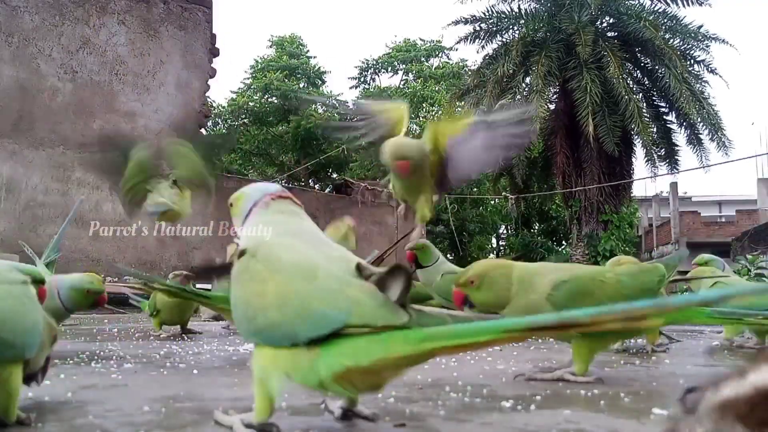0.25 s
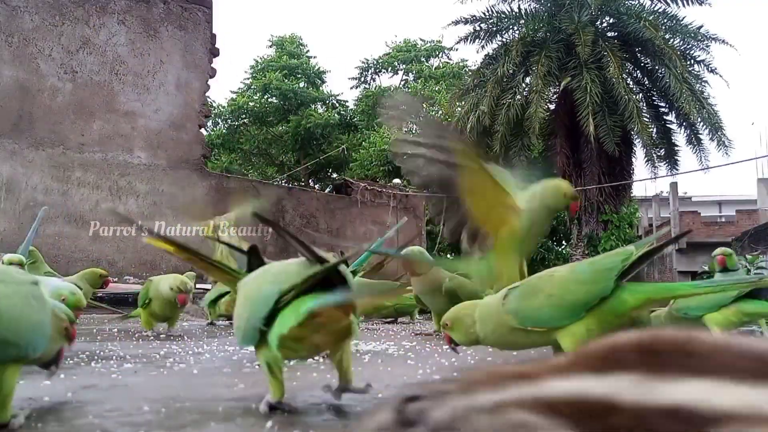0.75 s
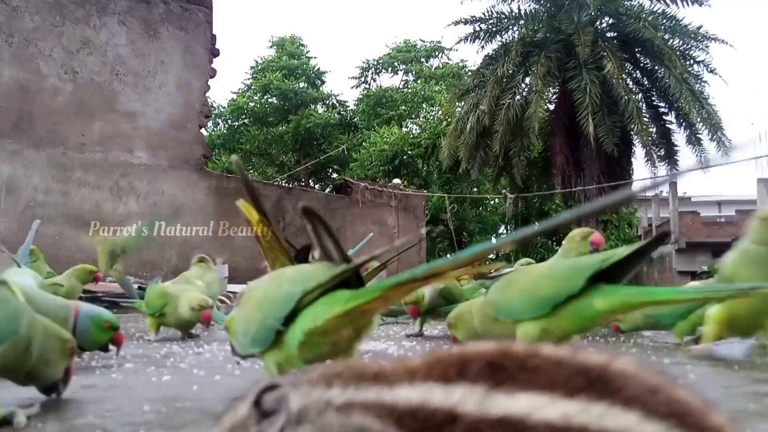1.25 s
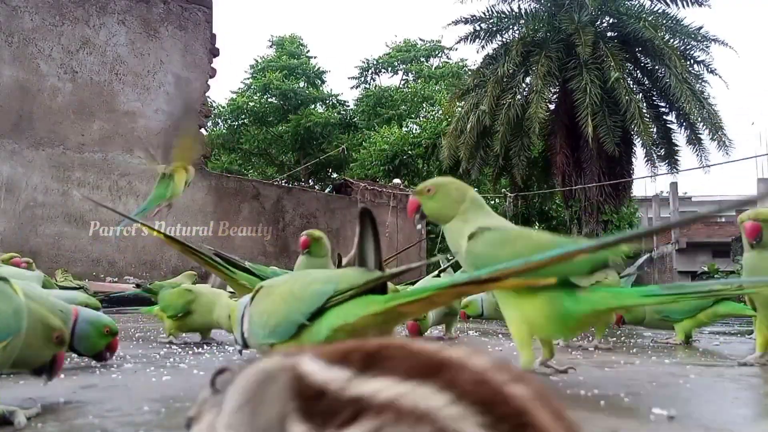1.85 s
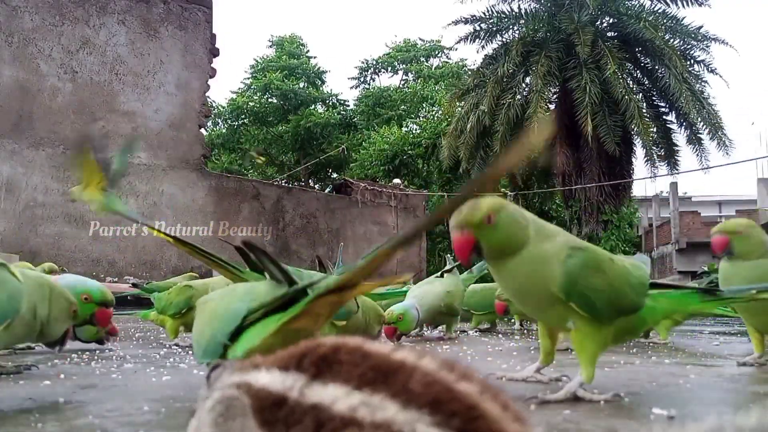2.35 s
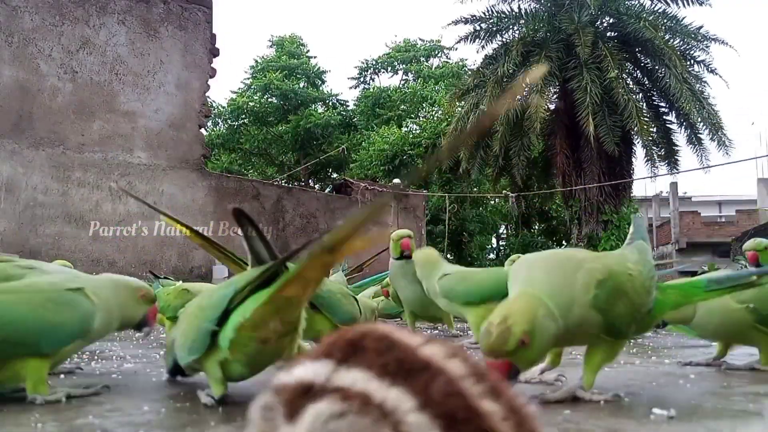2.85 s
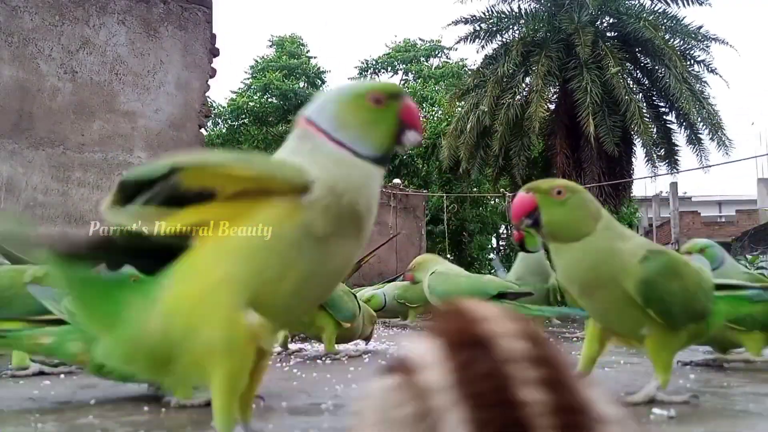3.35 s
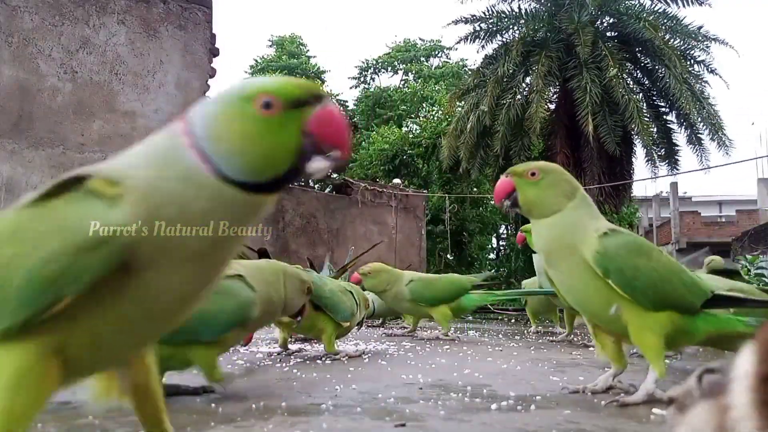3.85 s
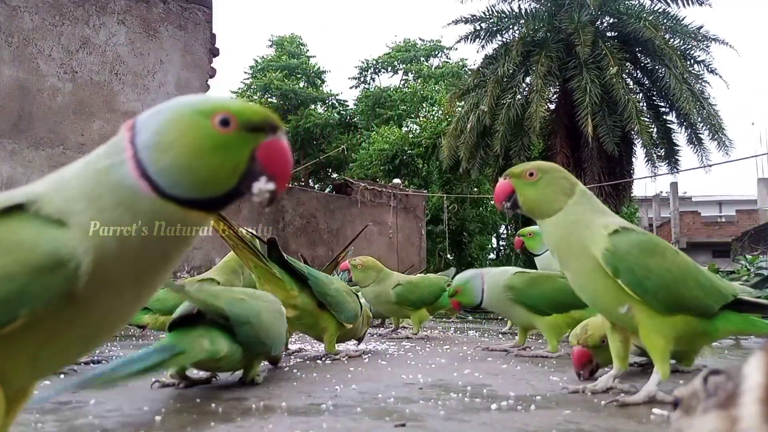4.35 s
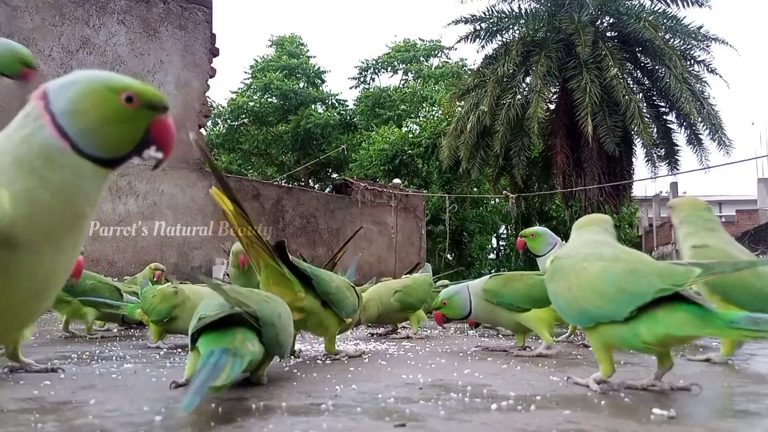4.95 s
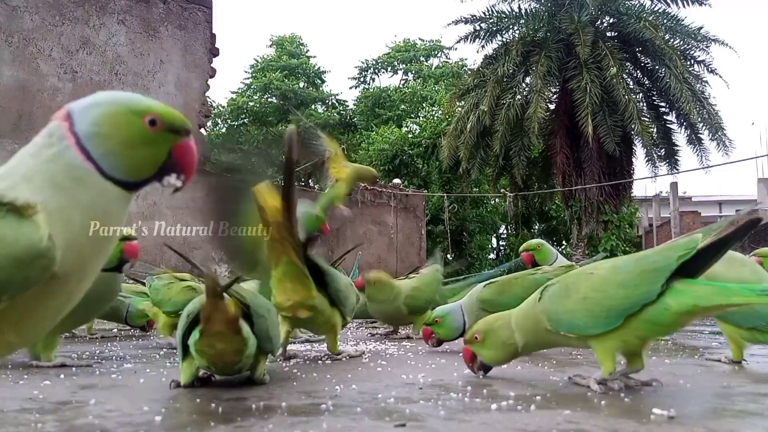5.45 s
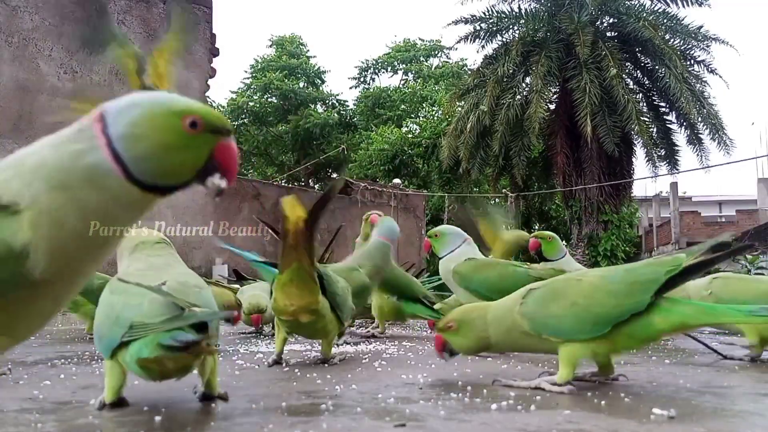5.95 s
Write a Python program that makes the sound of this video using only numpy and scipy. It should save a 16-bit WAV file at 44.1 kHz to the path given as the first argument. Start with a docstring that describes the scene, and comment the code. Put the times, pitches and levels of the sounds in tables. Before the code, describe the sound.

Parakeets feed on a flat roof: wings flutter, one harsh close squawk, soft chirrups, beak ticks, then shrill calls over a faint high whine.

```python
"""First a thin high whine, like an insect in the trees, over a low rumble and a patter of feet and beaks.
Then parakeets feed on a flat roof: wings flap, one squawks harshly close by, beaks tick on grain.
Soft chirrups, shrill calls from farther off and low grumbles follow; a draught buffets the microphone.
Voices are mostly stacks of gliding harmonics, the rest is mostly shaped noise; the walls give a short echo."""
import sys
import numpy as np
from scipy import signal
from scipy.fft import rfft, irfft, next_fast_len
from scipy.io import wavfile
from scipy.ndimage import uniform_filter1d, map_coordinates

SR = 44100
rng = np.random.default_rng(int(sys.argv[2]) if len(sys.argv) > 2 else 0)


def dump_mix(stems):
    """Bounce the given channels to the path in sys.argv[1] as a 16-bit WAV at rate SR."""
    frames = np.atleast_2d(stems).T  # one column per channel
    limited = np.clip(frames, -1, 1)  # hard clip at full scale
    pcm = np.round(limited * 32767).astype(np.int16)
    wavfile.write(sys.argv[1], SR, pcm)


N = 273420
T = np.arange(N) / SR  # time of each sample, s
TOP_HZ = 15800  # no sound is kept above this


def amp(db):
    """Turn decibels into a gain."""
    return 10 ** (np.asarray(db) / 20)


def unit(x):
    """Scale to an rms (average strength) of 1."""
    return x / np.sqrt(np.mean(x ** 2) + 1e-20)


def along(points, hz):
    """Read a curve of (f/Hz, value) points on a log frequency axis."""
    f, v = np.transpose(points)
    return np.interp(np.log(hz + 1), np.log(f + 1), v)


def curves(rows, t=T):
    """Draw straight lines between the rows: one curve for each column after the time."""
    s, *cols = np.transpose(rows)
    return [np.interp(t, np.sort(s), c) for c in cols]


def gate(rows, t=T):
    """Open (1) from the first row's time to the last, with soft 5 ms edges."""
    to_edge = np.minimum(t - rows[0][0], rows[-1][0] - t)
    return np.sin(np.pi / 2 * np.clip(to_edge / .005, 0, 1)) ** 2


def wobble(rate, size=N):
    """A smooth random curve through `rate` random points a second."""
    knots = rng.standard_normal(int(size * rate / SR) + 4)
    return map_coordinates(knots, [np.arange(size) * rate / SR])


def coloured(x, points):
    """Filter x to a (f/Hz, level/dB) shape, with no sound ahead of its cause."""
    m = 2 * next_fast_len(N // 2 + 4096)
    shape = amp(along(points, np.fft.rfftfreq(m, 1 / SR)))
    # folding the cepstrum (spectrum of the log spectrum) makes the filter minimum-phase
    cepstrum = irfft(np.log(shape))
    cepstrum[1:m // 2] *= 2
    cepstrum[m // 2 + 1:] = 0
    return irfft(rfft(x, m) * np.exp(rfft(cepstrum)))[:N]


def noise(points):
    """Hiss with the given colour, rms 1."""
    return unit(coloured(rng.standard_normal(N), points))


def lumpy(x, depth_db):
    """Random gain in patches of about 30 ms by 260 Hz, as from many small sources; rms 1."""
    z = signal.stft(x, nperseg=512)[2]
    patches = uniform_filter1d(rng.standard_normal(z.shape), size=3, axis=0)  # across frequency
    patches = uniform_filter1d(patches, size=5, axis=1)  # across time
    return unit(signal.istft(z * amp(depth_db * unit(patches)), nperseg=512)[1][:N])


# The whine's path: t/s, level/dB (before wavering and the line and hiss trims), centre f/Hz (before wander)
WHINE_PATH = [(0, -51, 3710), (.5, -48, 3736), (.9, -49, 3610), (1.24, -47.5, 3617), (1.41, -50.5, 3696),
              (1.54, -49.5, 3570), (1.75, -51.5, 3734), (1.9, -57.5, 3617), (2.35, -71, 3730),
              (3.78, -77, 3640), (3.93, -54, 3637), (4.06, -46, 3676), (4.4, -50.5, 3547),
              (4.72, -56, 3607), (5.22, -56.5, 3620), (6.2, -63, 3670)]
# Colour of the hiss around the whine: f/Hz, level/dB
WHINE_HISS = [(2000, -73.5), (2900, -27.5), (3150, -12.5), (3320, -3), (3460, -2), (3720, 4.5),
              (4030, -2.5), (4320, -14.5), (5200, -39.5), (7000, -58)]
WHINE_WAVER_DB, WHINE_WAVER_RATE = 1.82, 11  # depth in dB, random points a second


def whine(wander_hz=38, line_db=-3.5, hiss_db=-6.0):
    """Three fuzzy, wavering lines wander across each other inside a wider band of hiss."""
    db, hz = curves(WHINE_PATH)
    db = db + WHINE_WAVER_DB * wobble(WHINE_WAVER_RATE)
    lines = np.zeros(N)
    for _ in range(3):
        phase = 2 * np.pi * np.cumsum(hz + wander_hz * wobble(16)) / SR
        # random strengths of the two waves blur the tone
        lines += wobble(65) * np.cos(phase) + wobble(65) * np.sin(phase)
    # the lines are gone below -70 dB and full from -54 dB up
    strength = np.clip((db + 70) / 16, 0, 1)
    return amp(db) * (amp(line_db) * strength * unit(lines) + amp(hiss_db) * noise(WHINE_HISS))


# How busy the flock is: t/s, patter level/dB
BUSTLE = [(0, -69.5), (.22, -65), (.9, -66), (1.05, -70.5), (3.6, -70), (3.95, -62), (4.2, -72), (4.7, -70),
          (5.04, -66), (5.5, -68), (6.2, -63)]
# Colour of the patter: f/Hz, level/dB
PATTER_COLOUR = [(150, -17.5), (400, 3), (1000, -0.5), (1600, 5), (2100, -0.5), (2800, -7.5), (4500, -14.5),
                 (6500, -18.5), (8500, -38), (13500, -43), (15300, -18.5)]
# Colour of the low rumble: f/Hz, level/dB
RUMBLE_COLOUR = [(20, -36), (50, -8.5), (85, 0), (180, 0), (280, -3), (400, -19.5), (800, -18.5),
                 (2000, -49.5)]
# average dB, random slow drift in dB, dB of rumble per dB of bustle
RUMBLE_DB, RUMBLE_SWELL_DB, RUMBLE_FOLLOWS = -69, 0.2, 0.94


def background(patter_db=1):
    """A low rumble that grows with the bustle, and the patter of many small feet and beaks."""
    bustle_db, = curves(BUSTLE)
    low_db = RUMBLE_DB + RUMBLE_FOLLOWS * (bustle_db - bustle_db.mean()) + RUMBLE_SWELL_DB * wobble(4)
    patter = lumpy(noise(PATTER_COLOUR) * amp(patter_db * wobble(60)), 2.8)
    rumble = lumpy(noise(RUMBLE_COLOUR), 2.5)
    return amp(low_db) * rumble + amp(bustle_db) * patter


# Bouts of wingbeats: first beat t/s, number of beats, time between beats/s, swish level/dB (wings() trims it),
# air push level/dB, change over the bout/dB (down or up), stroke length/s (wings() adds 2 ms)
FLIGHTS = [ (0.172, 1, 0.093, -53, -77, 0, 0.011), (0.264, 6, 0.083, -38.5, -48, -17.5, 0.008),
           (0.297, 1, .085, -49, -53.5, 0, 0.0045), (0.327, 2, .082, -54.5, -45.5, 6, 0.0041),
           (0.54, 3, .04, -55.5, -53.5, -5, .012), (0.789, 1, .085, -50, -57.5, 0, 0.0037),
           (1.465, 1, .085, -61, -80, -2, 0.0085), (1.93, 1, .085, -67, -63, -3, 0.013),
           (3.853, 2, 0.074, -50.5, -45, 11, 0.0062), (3.871, 2, 0.069, -51.5, -47.5, -7, 0.0071),
           (4.989, 1, .085, -46.5, -63.5, 0, .01), (5.026, 2, 0.07, -52, -57.5, 4, 0.017),
           (5.093, 1, .085, -48.5, -65, 0, .006), (5.312, 1, .085, -53.5, -53.5, 0, 0.034)]
CHANGE_BEATS, PUSH_FOLLOWS = 1.3, 0.6  # pace of the change in beats; share of it the air push follows


def wingbeats():
    """List beats (t/s, swish/dB, push/dB, length/s), evenly spaced, that fade or swell after the first."""
    for start, beats, period, swish_db, push_db, change_db, length in FLIGHTS:
        for k in range(round(beats)):
            so_far_db = change_db * (1 - np.exp(-k / CHANGE_BEATS))
            yield start + k * period, swish_db + so_far_db, push_db + PUSH_FOLLOWS * so_far_db, length


# Colour of the feathers' swish: f/Hz, level/dB
FEATHERS = [(200, -4.5), (500, 7), (960, 4), (1400, 6.5), (2100, -1.5), (2900, -9), (4500, -16),
            (7000, -28), (9000, -45.5), (13000, -39), (15500, -35)]
# Colour of the air the wing pushes: f/Hz, level/dB
WING_PUSH = [(40, -36.5), (150, -1.5), (260, 9), (380, 4.5), (550, -15.5), (1000, -34.5), (3000, -80.5)]


def wings(swish_db=-3, grain_db=2.0):
    """Each stroke is a soft, lumpy swish of feathers on a low push of air."""
    swish_power, push_power = np.zeros(N), np.zeros(N)
    for s, feather_db, air_db, length in wingbeats():
        # a rounded bump, strongest 5 ms after the beat's time
        stroke = 1 / np.cosh(np.minimum(np.abs(T - s - .005) / (length + .002), 40))
        swish_power += (amp(feather_db) * stroke) ** 2
        push_power += (amp(air_db) * stroke) ** 2
    feathers = lumpy(noise(FEATHERS) * amp(grain_db * wobble(300)), 4.5)
    air = lumpy(noise(WING_PUSH), 1.5)
    return amp(swish_db) * np.sqrt(swish_power) * feathers + np.sqrt(push_power) * air


# Short low thumps, air on the microphone, and a brief low bird note at 5.404 s:
# t/s, level/dB, f/Hz, length/s
THUMPS = [(.275, -52.5, 85, 0.0053), (0.571, -45.5, 73.5, 0.007), (0.984, -55.5, 71.4, 0.014),
          (3.856, -37.5, 70, 0.0085), (4.016, -25, 117, 0.005), (4.034, -20.5, 137.4, 0.0044),
          (4.058, -37.5, 148, 0.0048), (5.404, -41, 242.5, 0.0082), (5.88, -50.5, 235, 0.011)]
# One gust against the microphone: t/s, level/dB
GUST = [(3.55, -86), (3.8, -47.5), (3.95, -46), (4.09, -41), (4.14, -58), (4.25, -60), (4.5, -81.5)]
# Colour of the gust: f/Hz, level/dB
BUFFET = [(15, -25), (35, -10.5), (70, 3.5), (130, -2), (200, -11), (350, -25), (900, -79)]


def draught_and_thumps():
    """A gust rumbles on the microphone as low noise; thumps and one low bird note are short smooth pulses."""
    out = amp(curves(GUST)[0]) * gate(GUST) * noise(BUFFET)
    for s, db, hz, length in THUMPS:
        swell = np.exp(-.5 * ((T - s) / length) ** 2)
        out -= amp(db) * swell * np.cos(2 * np.pi * hz * (T - s))
    return out


# The harsh squawk: t/s, pulse rate f/Hz (before jitter), level/dB, beak opening/0-1
SQUAWK = [(.853, 148.6, -57, 0), (.862, 149.5, -35.5, 0.03), (.873, 145.6, -25.5, .05),
          (.886, 149.4, -24.5, 0), (.902, 145.9, -24, 0.7), (.925, 141.4, -25, 0.9),
          (.952, 146.8, -27.5, 0.94), (.973, 151, -33.5, 1), (.979, 148, -45, 0.7)]
# Colour of the voice with the beak nearly shut: f/Hz, level/dB
BEAK_NARROW = [(400, -58.5), (750, -42), (1000, -21.5), (1300, 1.5), (1600, -3), (1820, -13.5), (2100, -5),
               (2800, -11), (3500, -24), (4900, -18.5), (7500, -37.5), (9000, -52), (13000, -52.5),
               (15500, -37)]
# Colour of the voice with the beak open: f/Hz, level/dB
BEAK_WIDE = [(400, -34.5), (620, -35), (820, -14), (1200, -0.5), (1700, -6), (2050, 6), (2400, -7),
             (2800, -4), (3300, -21.5), (4100, -6), (5200, -24), (7500, -33.5), (9500, -54.5), (15500, -49)]


def squawk(ring=0.0068):
    """The syrinx (a bird's voice box) opens in near-regular bursts; the beak's opening changes the colour."""
    hz, db, opening = curves(SQUAWK)
    jitter, burst, rough = .017, .8, .42  # shares: of the pulse rate, of each cycle, of the power
    cycles = np.cumsum(hz * (1 + jitter * wobble(150))) / SR
    snaps = unit(np.diff(np.floor(cycles), prepend=0))
    rasp = unit(rng.standard_normal(N) * (cycles % 1 < burst))
    # each opening sets off the same short, colourless rattle of the membranes, plus fresh rasp
    t = T[:SR // 100]
    dying_noise = rng.standard_normal(len(t)) * np.exp(-t / ring)
    rattle = irfft(np.exp(1j * np.angle(rfft(dying_noise))))
    rattling = unit(signal.fftconvolve(snaps, rattle)[:N])
    source = np.sqrt(1 - rough) * rattling + np.sqrt(rough) * rasp
    opening = np.clip(opening, 0, 1)
    narrow, wide = unit(coloured(source, BEAK_NARROW)), unit(coloured(source, BEAK_WIDE))
    voice = (1 - opening) * narrow + opening * wide
    # steady effort: the bursts stay even in strength
    voice /= np.sqrt(np.abs(uniform_filter1d(voice ** 2, size=450)) + 1e-9)
    return voice * amp(db) * gate(SQUAWK)


# Pecks at grain: t/s, peak level/dB (before the treble colour), ring f/Hz
PECKS = [(1.248, -42, 1890), (1.379, -63, 5770), (1.444, -52.5, 5820), (1.443, -47, 1560),
         (2.009, -65, 6100), (2.143, -58, 1400), (2.539, -54.5, 1680), (2.877, -64, 3470),
         (3.276, -57, 4460), (3.277, -57.5, 12000), (3.664, -50, 1400), (4.09, -40.5, 4075)]
# Colour of the ticks' treble: f/Hz, level/dB
TICK_TREBLE = [(6500, 0), (9000, -13.5), (12000, -4)]


def pecks(t60=0.013, width=0.48):
    """A beak cracks a grain: noise dying 60 dB in t60 seconds, through a broad ring, makes a dry tick."""
    out, t = np.zeros(N + SR), np.arange(SR // 10) / SR
    f = np.fft.rfftfreq(len(t), 1 / SR)
    for s, db, hz in PECKS:
        crack = rng.standard_normal(len(t)) * amp(-60 * t / t60)
        damping = 1j * f * width * hz
        ring = damping / (hz ** 2 - f ** 2 + damping)
        tick = irfft(rfft(crack) * ring ** 3)
        out[round(s * SR):][:len(tick)] += amp(db) * tick / np.abs(tick).max()
    return coloured(out[:N], TICK_TREBLE)


TRILL_HZ = 51.1


def syllable(s, length, db, crest, start_hz, middle_hz, end_hz, rise_db, fall_db, power, trill=0):
    """One call as rows (t/s, f/Hz, level/dB): it swells to its crest and fades as the pitch bends smoothly."""
    u = np.linspace(0, 1, 65)  # progress through the call
    bend = np.polyfit([0, .5, 1], np.log([start_hz, middle_hz, end_hz]), 2)
    arc = np.exp(np.polyval(bend, u))
    crest = np.clip(crest, .02, .98)
    before, after = np.maximum(crest - u, 0) / crest, np.maximum(u - crest, 0) / (1 - crest)
    hz = arc * (1 + trill * np.sin(2 * np.pi * TRILL_HZ * length * u))
    return np.column_stack([s + length * u, hz, db - rise_db * before ** power - fall_db * after ** power])


def note(beak_hz, rows, throat, beak_db, octaves, jitter, flutter_db, hoarse):
    """Harmonics of the syrinx glide through throat and beak resonance; hoarseness frays each into noise."""
    first, last = int(rows[0][0] * SR), min(int(rows[-1][0] * SR), N)
    t, out = T[first:last], np.zeros(N)
    if len(t) < 2:
        return out
    drift = lambda rate: wobble(rate, size=len(t))
    hz, db = curves(rows, t)
    hz = uniform_filter1d(hz, size=200) * (1 + jitter * drift(300))
    k = np.arange(1, 9)[:, None]  # harmonic numbers
    beak = beak_db * np.exp(-(np.log2(k * hz / beak_hz) / octaves) ** 2)
    weights = amp(along(throat, k * hz) + beak) * (k * hz < TOP_HZ)
    weights /= np.sqrt(np.sum(weights ** 2, axis=0) / 2)  # throat and beak change the colour, not the loudness
    hoarse = np.clip(hoarse, 0, 1)
    fray = np.array([drift(656.6) + 1j * drift(650) for _ in k])
    tones = np.exp(2j * np.pi * k * np.cumsum(hz) / SR)
    partials = (np.sqrt(1 - hoarse) + np.sqrt(hoarse / 2) * fray) * tones
    voice = np.sum(weights * partials.imag, axis=0)
    out[first:last] = voice * amp(db + flutter_db * drift(248.8)) * gate(rows, t)
    return out


# One warbling chirrup: t/s, f/Hz, level/dB
WARBLE = [(1.657, 2018, -52), (1.665, 1522, -51.5), (1.678, 1237, -54.5), (1.701, 1783, -42.5),
          (1.711, 1673, -47), (1.72, 1136, -44), (1.728, 1060, -41.5), (1.738, 1260, -43.5),
          (1.746, 1320, -59)]
WARBLE_BEAK_HZ = 1510
# Soft chirrups, mostly of the near birds, with a few faint distant notes: t/s, length/s, level/dB at the crest,
# crest/0-1 of the length, start f/Hz, middle f/Hz, end f/Hz, beak resonance f/Hz
CHIRRUPS = [ (1.825, 0.02, -51, .4, 1970, 1885, 1910, 1900),
            (1.855, 0.025, -46, .3, 1780, 1773, 1750, 1800), (2.153, .062, -64, 0, 2400, 2530, 2740, 2500),
            (2.365, 0.059, -50, .12, 509, 503.5, 496, 990), (2.693, 0.037, -48, 0.7, 795, 773, 720, 1260),
            (2.718, 0.052, -44, 0.07, 683, 579, 575, 1220),
            (2.787, 0.041, -34.5, 0.12, 943, 994, 1290, 2320), (2.903, 0.08, -53.5, 1, 631, 526, 459, 716),
            (2.959, 0.048, -43, 0.29, 799, 673, 834, 1310), (3.247, .032, -52.5, 0.4, 875, 543, 500, 1540),
            (3.478, 0.033, -51, 0.14, 880, 550, 540, 1670),
            (3.752, .09, -63.5, 0.9, 2620, 2235, 1950, 2200),
            (4.151, 0.085, -72, .15, 2230, 2140, 2130, 2137),
            (4.221, 0.077, -61.5, 0.58, 1222, 1190, 1195, 1190),
            (4.361, 0.057, -68.5, 0.17, 2240, 2125, 2084, 2180),
            (5.904, 0.15, -53, 0.03, 2140, 2037, 2004, 2080)]
# Throat colour of the soft voices, chirrups and grumbles: f/Hz, level/dB
SOFT_THROAT = [(300, -3.5), (500, -6), (700, 6.5), (1000, -4), (1450, 0.5), (1950, -1), (2400, -13),
               (2900, -16.5), (3600, -29), (5700, -35.5), (7000, -60)]
FULL_VOICE_DB = -35  # a chirrup at full effort


def chirrups(full_voice_hoarse=0.061):
    """Soft notes, mostly near with a few faint distant ones, hoarser the louder; and one clean warble."""
    voice = dict(throat=SOFT_THROAT, beak_db=11.5, octaves=0.71, jitter=0.006, flutter_db=.6)
    out = note(WARBLE_BEAK_HZ, WARBLE, hoarse=0.018, **voice)
    for s, length, db, *bend, beak_hz in CHIRRUPS:
        rows = syllable(s, length, db, *bend, rise_db=10.5, fall_db=14.5, power=1.68)
        out += note(beak_hz, rows, hoarse=full_voice_hoarse * amp(db - FULL_VOICE_DB), **voice)
    return out


# Shrill calls from farther off: t/s, length/s, level/dB at the crest (scene() lowers it), crest/0-1,
# start f/Hz, middle f/Hz, end f/Hz, beak resonance f/Hz, hoarseness/0-1, trill depth/share of the pitch
SHRIEKS = [ (2.597, 0.025, -57.5, .4, 1820, 1800, 1800, 5500, 0.3, 0),
           (2.613, 0.1, -63.5, 0.56, 1640, 1492, 1520, 3000, 0.3, 0.0054),
           (2.703, 0.045, -54, 0.4, 1690, 1704, 1650, 3400, 0.18, 0),
           (3.589, 0.11, -65, .5, 1860, 1872, 1887, 5640, 0, 0.0058),
           (3.629, 0.034, -51.5, .35, 1740, 1790, 1740, 3500, .25, 0.033),
           (3.665, 0.064, -59, 0.5, 1550, 1509, 1560, 3100, 0.4, 0.037),
           (3.727, 0.059, -51, 0.24, 1723, 1686, 1663, 3360, 0.2, 0),
           (4.781, 0.061, -57.5, 0.9, 1280, 1275, 1277, 5000, 0.3, 0),
           (4.812, 0.089, -49.5, 0.04, 1800, 1687, 1590, 3370, 0.07, 0.0075),
           (4.881, .11, -50, 0.34, 1590, 1484, 1463, 3030, 0.04, 0.0025),
           (5.711, 0.038, -44, 0.73, 1590, 1610, 1850, 6100, 0, 0.016),
           (5.741, 0.12, -42.5, 0.4, 2490, 1830, 1148, 2300, 0.04, 0),
           (5.746, 0.061, -55, 0.5, 1717, 1753, 1660, 3450, 0, 0),
           (5.827, 0.2, -54, 0, 1504, 1447, 1443, 2950, .12, 0.016),
           (6.067, 0.11, -46, 0.26, 1260, 2130, 1740, 5100, 0.13, 0.0051),
           (6.134, 0.077, -46, 0.14, 1433, 1405, 1296, 2760, 0.04, 0.14)]
# Throat colour of the shrill calls: f/Hz, level/dB
SHRILL_THROAT = [(1000, -21.5), (1600, 1.5), (2300, -3), (3000, 8.5), (3700, 7.5), (4600, -4.5),
                 (6200, -6.5), (7000, -21.5), (7600, -39.5), (10000, -43.5), (12000, -59)]


def shrieks():
    """Bright, sweeping calls across the roof, each with a narrow beak resonance."""
    out = np.zeros(N)
    for *shape, beak_hz, hoarse, trill in SHRIEKS:
        rows = syllable(*shape, rise_db=9.0, fall_db=12, power=1.15, trill=trill)
        out += note(beak_hz, rows, SHRILL_THROAT, beak_db=9.5, octaves=0.17,
                    jitter=0.009, flutter_db=3.6, hoarse=hoarse)
    return out


# Low, hoarse chatter in a squabble: t/s, length/s, level/dB at the crest, crest/0-1,
# start f/Hz, middle f/Hz, end f/Hz, beak resonance f/Hz
GRUMBLES = [ (4.779, 0.13, -65.5, 0.55, 409.6, 465, 485, 900), (4.938, .12, -60, 0.22, 700, 657, 603, 1480),
            (5.058, 0.072, -51.5, 0.18, 617, 524, 607, 654),
            (5.152, 0.076, -57.5, 0.71, 641, 684, 624, 990),
            (5.265, 0.051, -52, 0.6, 490.5, 461.5, 465, 1290),
            (5.317, 0.039, -57.5, 0.24, 473, 413, 357, 1180),
            (5.445, 0.086, -59, 0.14, 432, 425.6, 460, 402)]


def grumbles():
    """The soft throat again, low and hoarse, with an unsteady pitch and level."""
    out = np.zeros(N)
    for *shape, beak_hz in GRUMBLES:
        rows = syllable(*shape, rise_db=8.5, fall_db=12, power=0.95)
        out += note(beak_hz, rows, SOFT_THROAT, beak_db=20, octaves=0.67,
                    jitter=0.022, flutter_db=6.0, hoarse=0.17)
    return out


# How long the roof's echo lasts: f/Hz, time to die by 60 dB/s
ROOF_ECHO = [(200, 0.33), (1500, 0.12), (4000, 0.22), (7000, 0.25), (10000, 0.17)]


def walls(x):
    """The short answer of the walls: a tail of noise, 5 ms late, that dies at its own pace in each band."""
    hz, t, z = signal.stft(rng.standard_normal(SR // 2), SR, nperseg=256)
    decay = amp(-60 * t / along(ROOF_ECHO, hz)[:, None])
    tail = signal.istft(z * decay, SR, nperseg=256)[1]
    late = np.pad(x, (SR // 200, 0))
    return signal.fftconvolve(late, tail / np.linalg.norm(tail))[:N]


WALL_DELAY_S, WALL_DB = .022, -12  # a wall behind the far birds repeats their calls


def scene():
    """Near birds are drier, far birds wetter and doubled by a wall; both channels hear the same."""
    close = squawk() + wings()
    soft = chirrups() + grumbles() + pecks()
    far = shrieks()
    far = far + amp(WALL_DB) * np.pad(far, (round(WALL_DELAY_S * SR), 0))[:N]
    echo = walls(amp(-11) * close + amp(-11) * soft + amp(-10) * far)
    mono = close + soft + amp(-3.0) * far + echo + whine() + draught_and_thumps() + background()
    return np.array([mono, mono])


def record(dry):
    """Keep nothing above TOP_HZ."""
    m = next_fast_len(N + SR // 2)
    kept = np.fft.rfftfreq(m, 1 / SR) < TOP_HZ
    return irfft(rfft(dry, m) * kept, m)[:, :N]


dry = scene()
out = record(dry)
dump_mix(out)
```